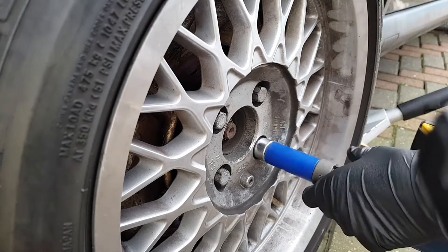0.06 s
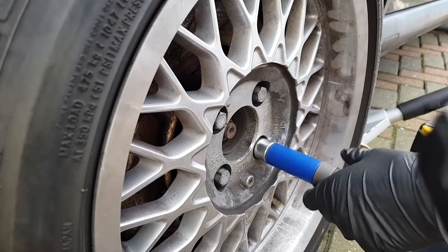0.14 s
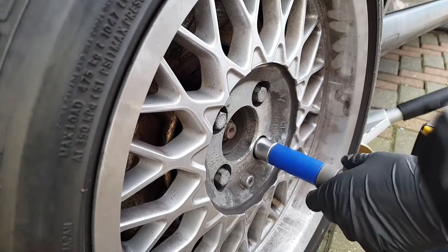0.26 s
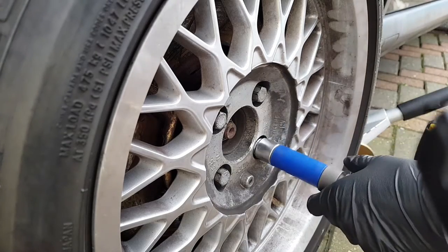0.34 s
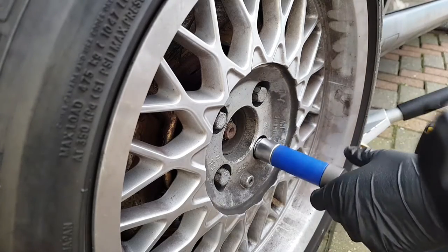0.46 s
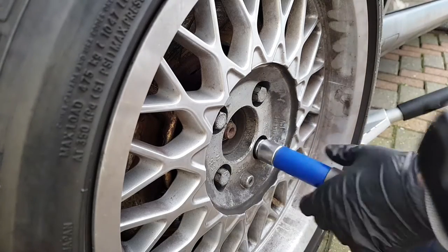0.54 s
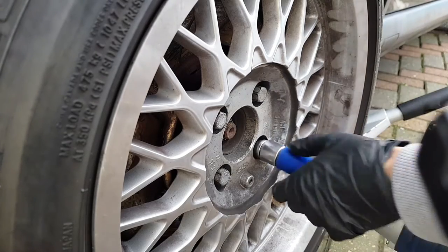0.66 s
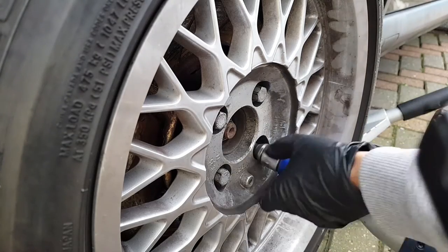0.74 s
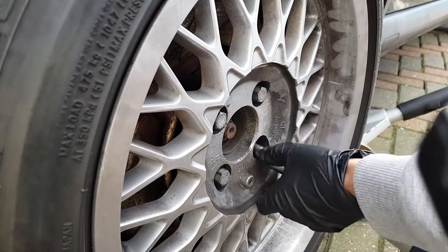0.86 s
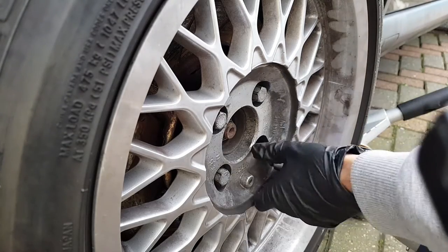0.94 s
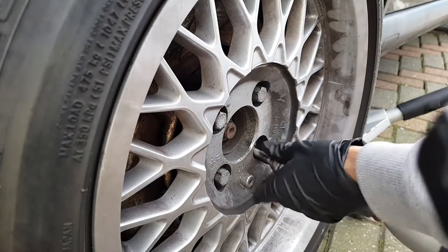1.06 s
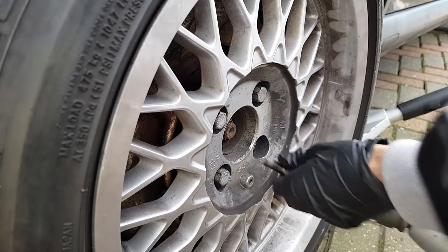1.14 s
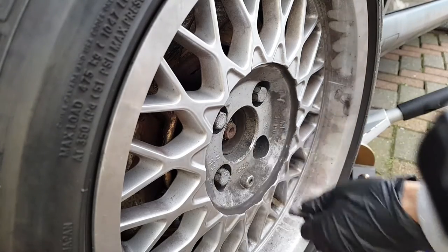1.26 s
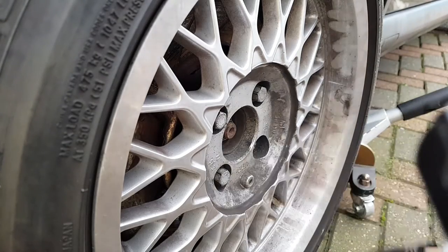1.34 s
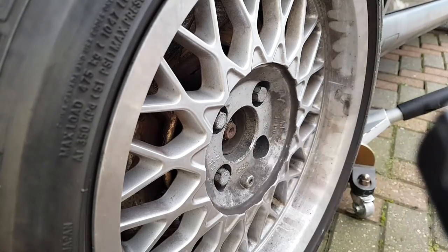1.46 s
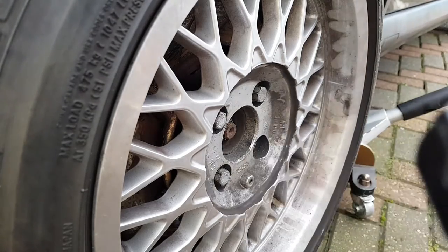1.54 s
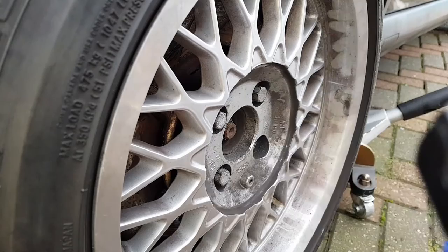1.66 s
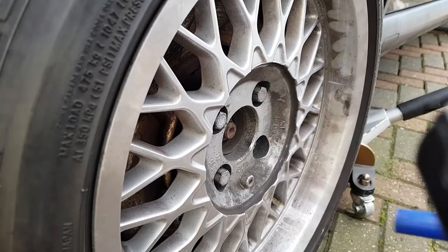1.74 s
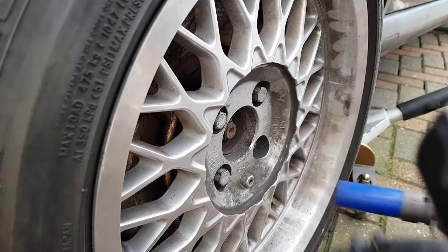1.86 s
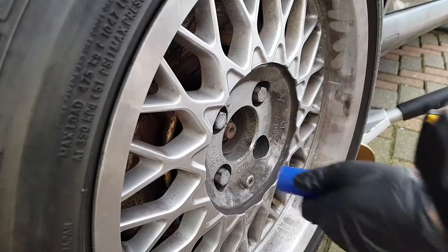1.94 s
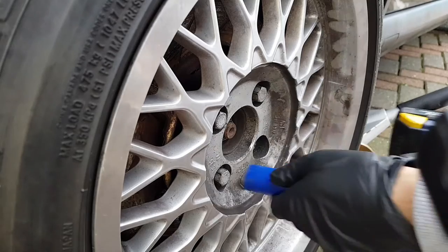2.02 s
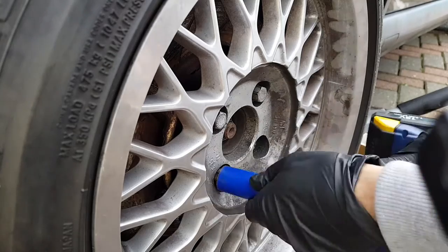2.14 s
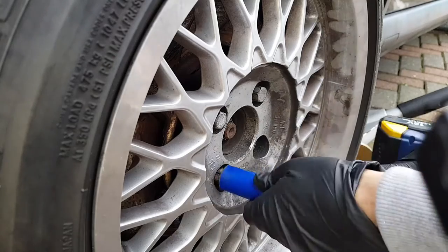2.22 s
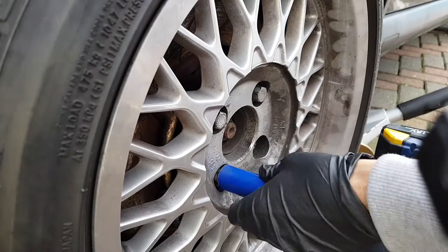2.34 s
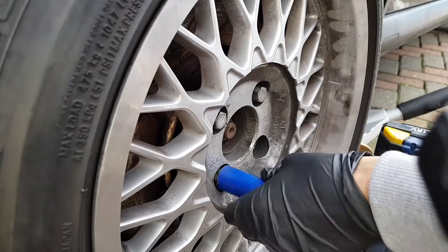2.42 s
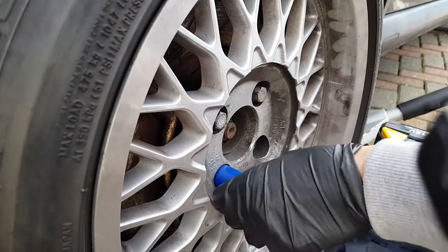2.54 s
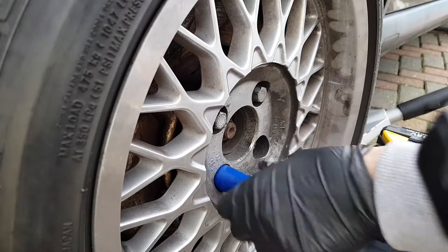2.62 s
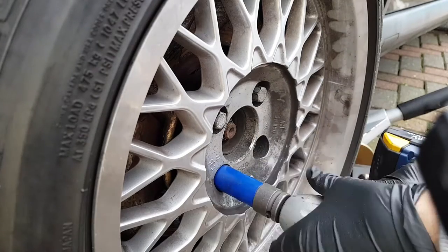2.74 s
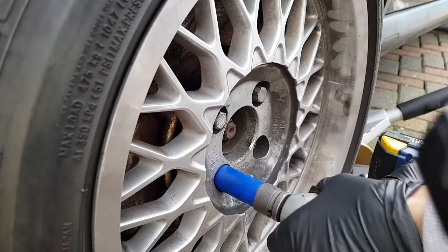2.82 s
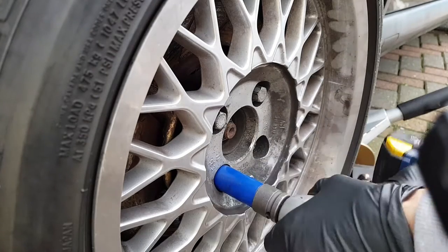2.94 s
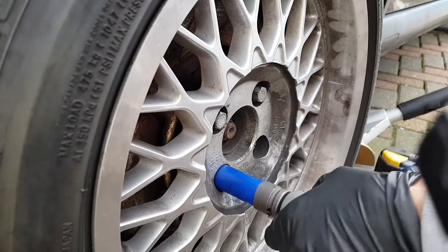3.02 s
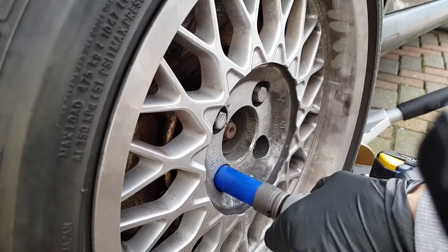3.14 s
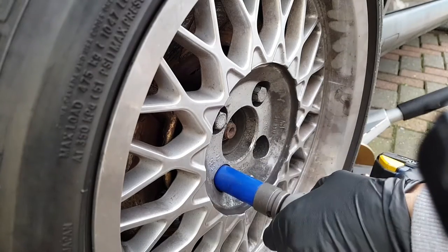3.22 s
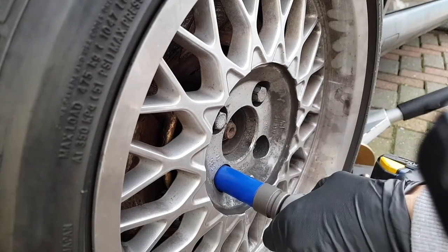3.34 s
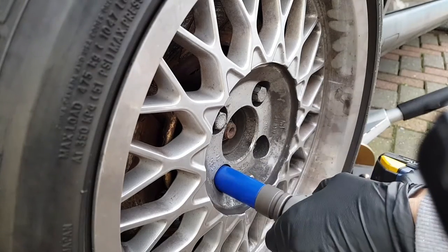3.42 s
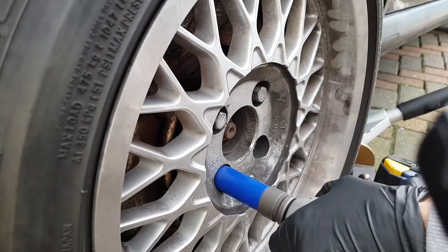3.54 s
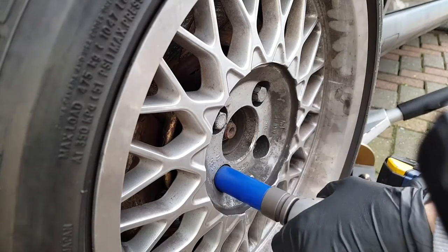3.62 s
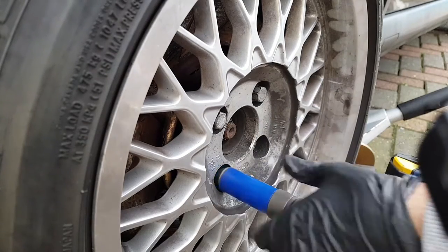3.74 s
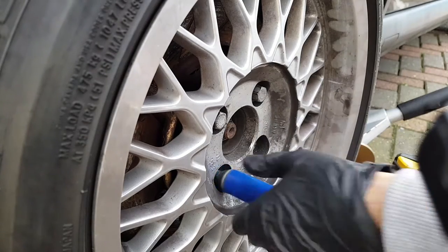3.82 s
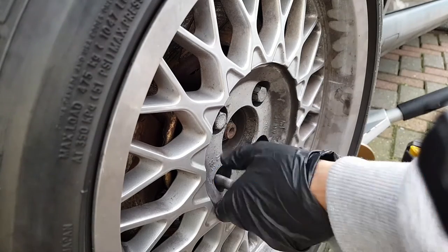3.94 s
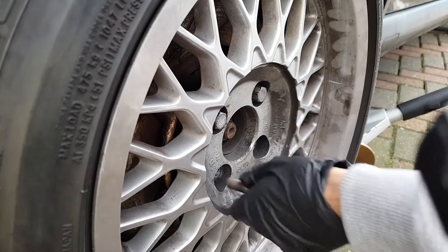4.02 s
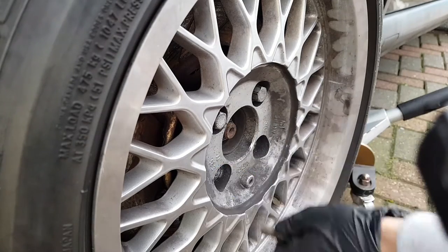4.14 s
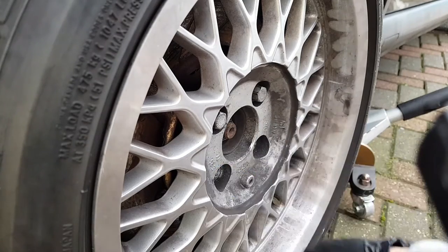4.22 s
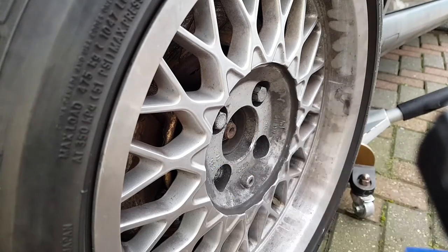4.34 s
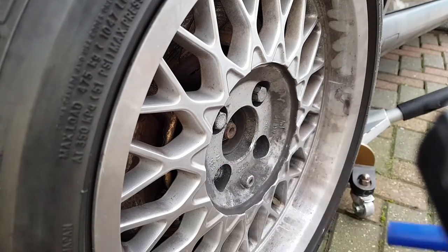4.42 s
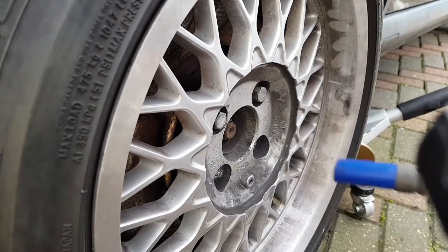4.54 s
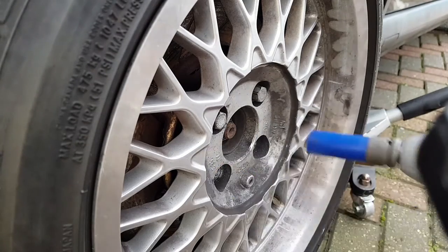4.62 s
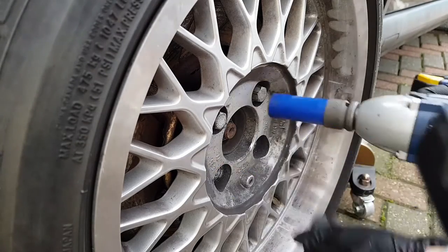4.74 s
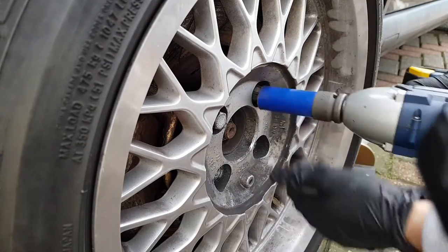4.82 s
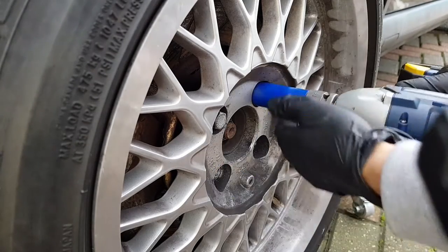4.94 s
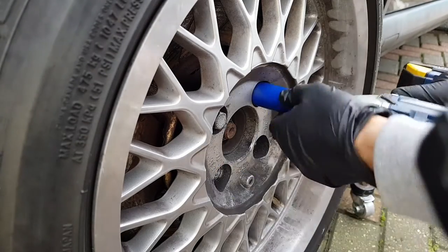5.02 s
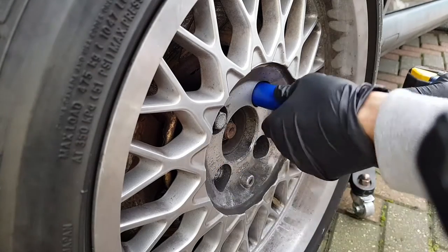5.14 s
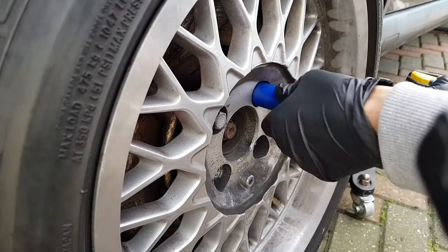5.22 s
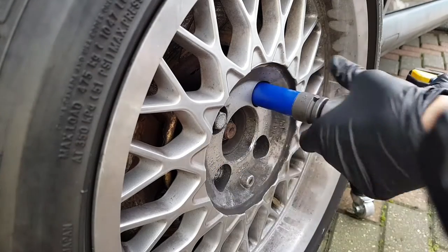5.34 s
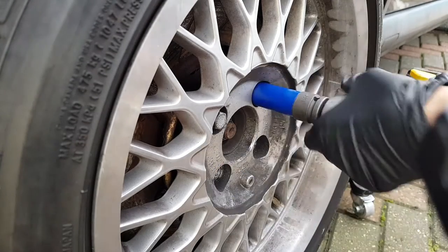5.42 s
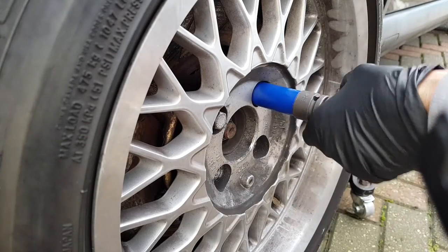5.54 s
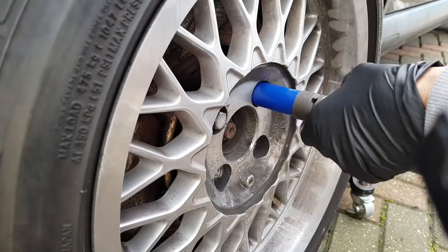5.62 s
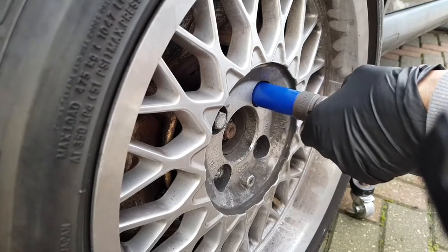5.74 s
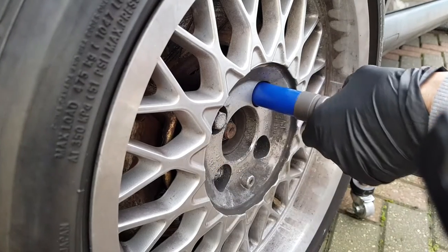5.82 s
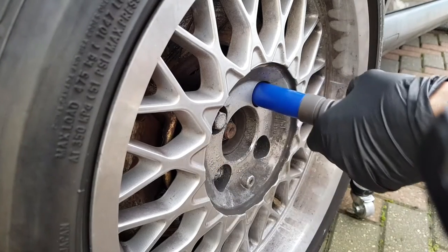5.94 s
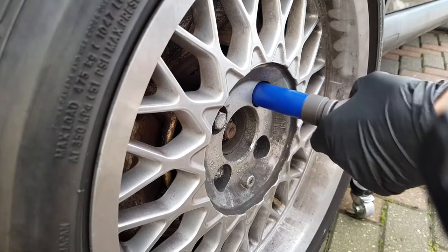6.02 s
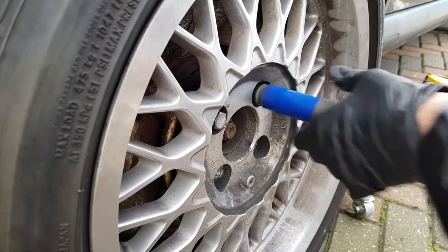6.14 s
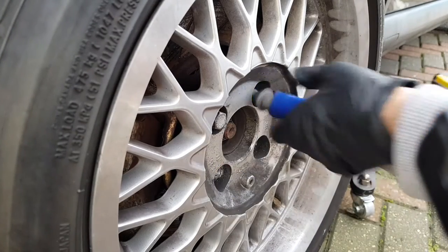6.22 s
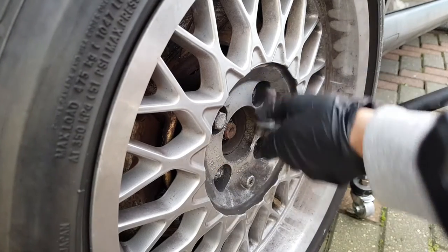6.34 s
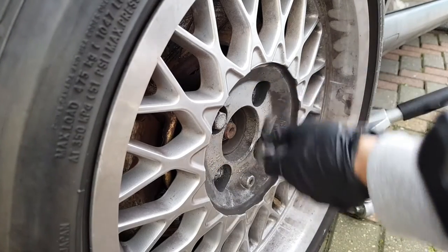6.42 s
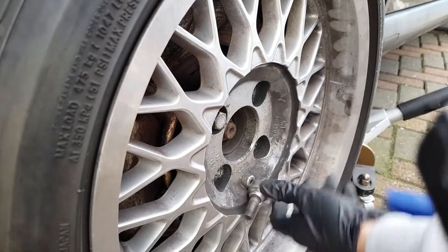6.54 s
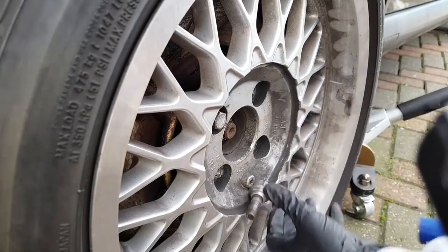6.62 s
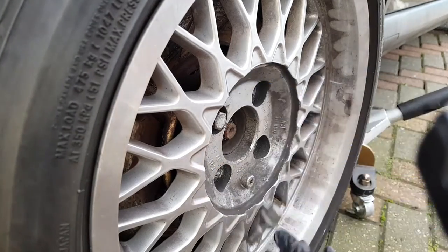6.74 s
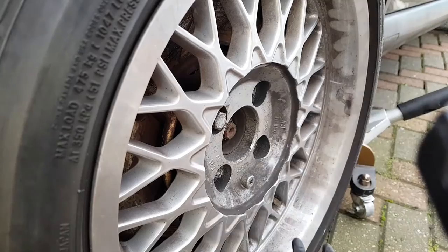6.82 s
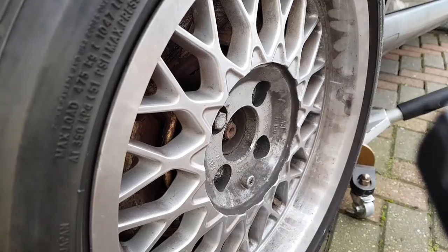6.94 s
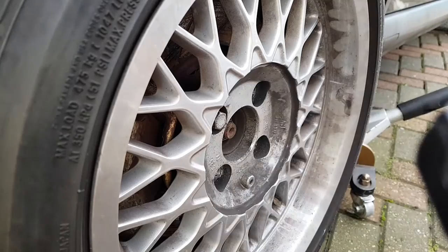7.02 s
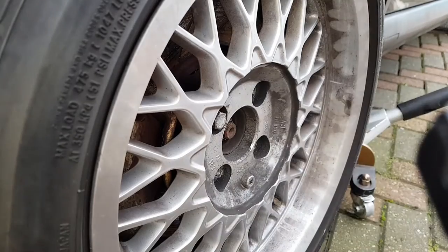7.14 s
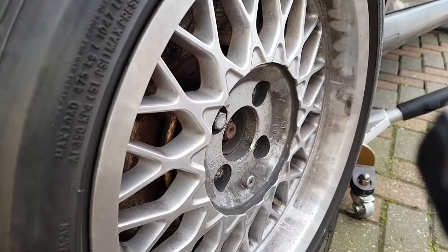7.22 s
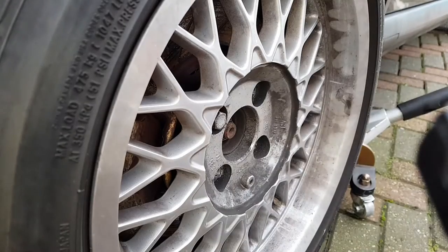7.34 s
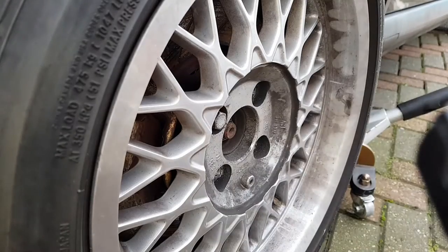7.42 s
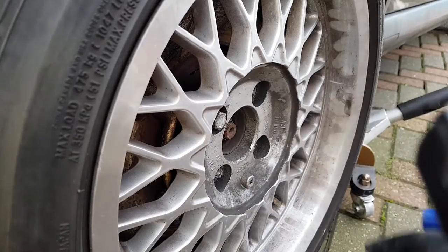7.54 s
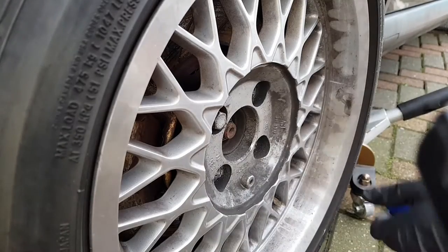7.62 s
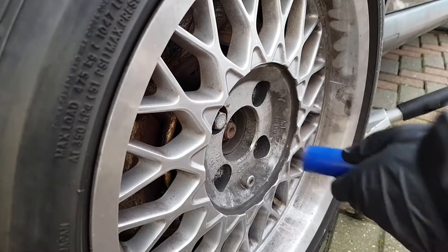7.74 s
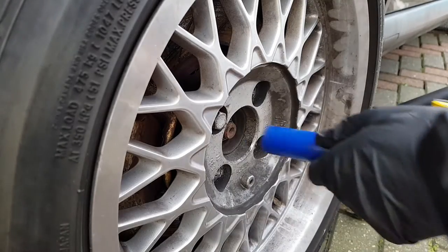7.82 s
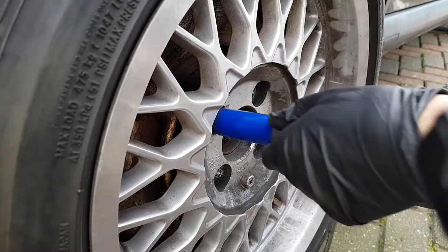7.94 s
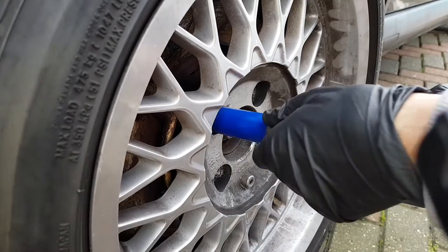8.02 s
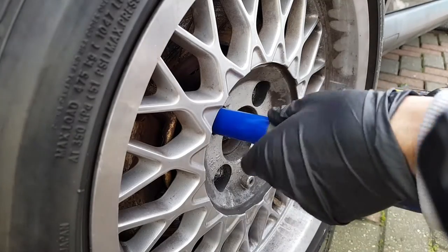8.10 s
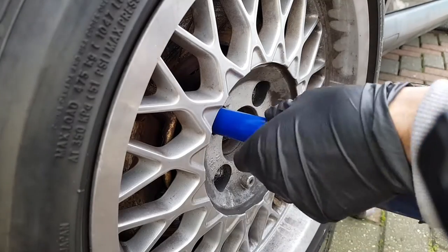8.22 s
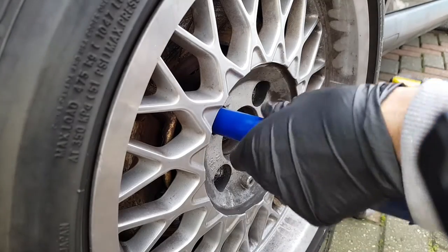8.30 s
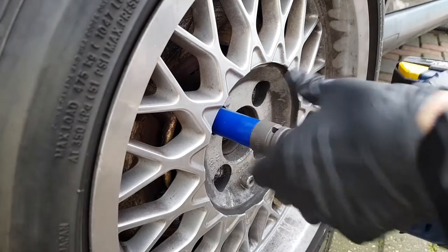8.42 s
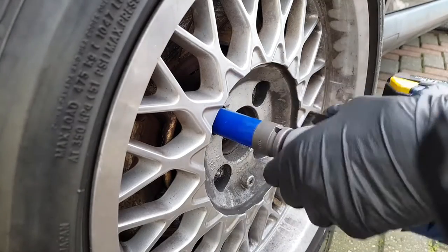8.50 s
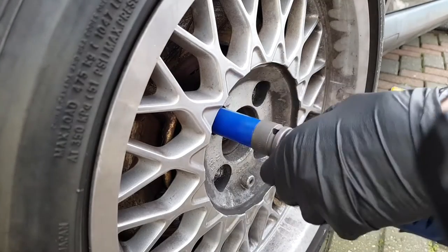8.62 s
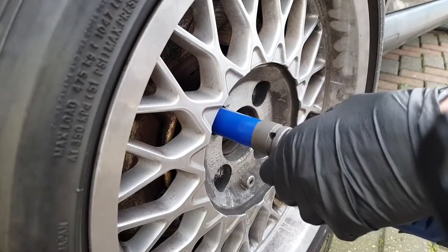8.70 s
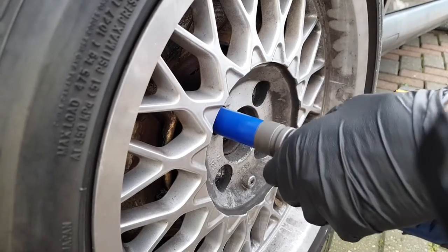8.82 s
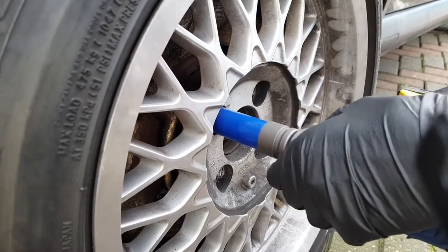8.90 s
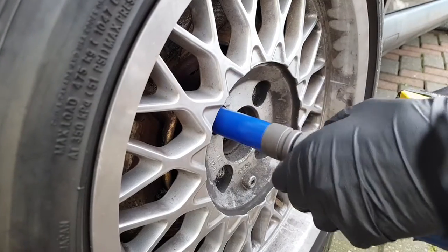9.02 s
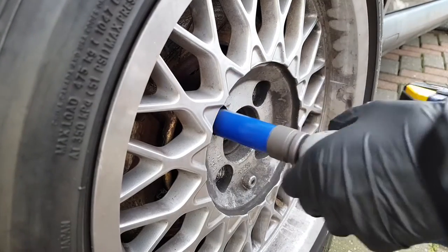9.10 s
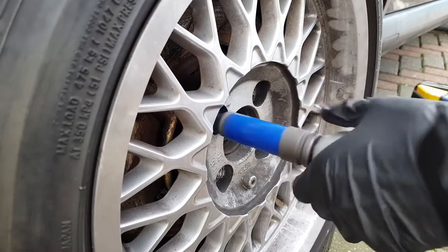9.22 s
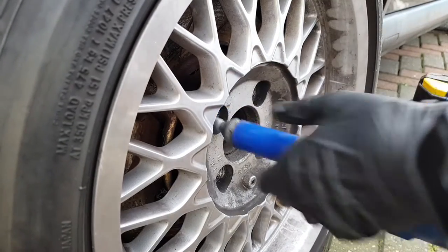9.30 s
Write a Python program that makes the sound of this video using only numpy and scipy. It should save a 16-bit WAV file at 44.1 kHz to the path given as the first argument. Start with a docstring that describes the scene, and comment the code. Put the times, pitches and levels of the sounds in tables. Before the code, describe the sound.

Outdoors and close up, four rattling impact-wrench bursts each run into a rising motor whine, separated by quiet pauses with clicks, rustling and a dropped bolt.

```python
"""A knock and a burst of hammering come first: a cordless impact wrench undoes four bolts of an alloy wheel outdoors.
The hammer pounds the socket about 37 times a second, as noise bursts ringing socket and wheel.
The motor whines freely to spin the bolt out: tones and noise that follow the speed of its shaft.
In between, parts click, a bolt bounces on the paving (struck resonances), thin tones squeak and gloves rustle.
Behind it all, shaped noise rumbles low and swells as the camera is handled, beside a faint wavering hum."""
import sys
import numpy as np
from scipy import signal
from scipy.fft import rfft, irfft, next_fast_len
from scipy.io import wavfile
from scipy.ndimage import uniform_filter1d, map_coordinates

SR = 44100
rng = np.random.default_rng(int(sys.argv[2]) if len(sys.argv) > 2 else 0)


def int16_out(signal):
    """Quantize to a 16-bit WAV file."""
    q = np.round(np.clip(np.atleast_2d(signal).T, -1, 1) * 32767)
    wavfile.write(sys.argv[1], SR, q.astype(np.int16))


N = 413216
TIME = np.arange(N) / SR
AGE = np.arange(SR // 4) / SR  # time since a hit


def amp(db):
    """Decibels to gain."""
    return 10 ** (np.asarray(db) / 20)


def unit(x):
    """Scale to rms 1."""
    return x / np.sqrt(np.mean(x ** 2) + 1e-20)


def along(points, hz):
    """Read a value between (frequency [Hz], value) points on a log frequency axis."""
    point_hz, value = np.transpose(points)
    return np.interp(np.log(hz + 1), np.log(point_hz + 1), value)


def curve(rows, column=1):
    """One value per sample from rows that start with a time."""
    rows = np.array(rows)
    return np.interp(TIME, rows[:, 0], rows[:, column])


def wobble(rate, size=N):
    """A smooth random curve with rate knots a second."""
    knots = rng.standard_normal(int(size * rate / SR) + 4)
    return map_coordinates(knots, [TIME[:size] * rate])


def bell(s, length):
    """A smooth rise and fall around time s; length is its width at 1/e of the peak."""
    return np.exp(-(2 * (TIME - s) / length) ** 2)


def swells(rows):
    """Sum of bells as a gain, from (time [s], length [s], level [dB]) rows."""
    return sum(amp(db) * bell(s, length) for s, length, db in rows)


def filtered(x, response):
    """Multiply the spectrum of x by a function of frequency."""
    size = next_fast_len(len(x) + 8192)
    spectrum = rfft(x, size) * response(np.fft.rfftfreq(size, 1 / SR))
    return irfft(spectrum, size)[:len(x)]


def noise(spectrum):
    """Steady coloured noise of rms 1."""
    return unit(filtered(rng.standard_normal(N), lambda hz: amp(along(spectrum, hz))))


def coloured(x, spectrum, size=2048):
    """Causal filter with the given spectrum: nothing sounds before the hit."""
    gain = amp(along(spectrum, np.fft.rfftfreq(size, 1 / SR)))
    cepstrum = irfft(np.log(gain + 1e-6))
    # folding the cepstrum forward in time gives the minimum-phase filter
    fold = np.r_[1, np.full(size // 2 - 1, 2), np.zeros(size // 2)]
    impulse = irfft(np.exp(rfft(cepstrum * fold)))
    return signal.fftconvolve(x, impulse)[:len(x)]


def resonate(x, modes):
    """Ring x through (frequency [Hz], width [Hz], level [dB]) resonances of alternating sign."""
    def response(f):
        total = 0
        for k, (hz, width, db) in enumerate(modes):
            resonance = 1j * f * width / (hz * hz - f * f + 1j * f * width)
            total = total + (-1) ** k * amp(db) * resonance
        return total
    return filtered(x, response)


def burst(t60):
    """Noise that starts at once and falls 60 dB in t60 seconds."""
    return rng.standard_normal(len(AGE)) * amp(-60 * AGE / t60)


def punch(x, size=220):
    """Scale a hit to the energy of 5 ms (220 samples) at rms 1."""
    return x * np.sqrt(size / np.sum(x ** 2))


def add(track, s, x):
    """Mix x into the track at time s."""
    start = max(round(s * SR), 0)
    track[start:start + len(x)] += x[:max(N - start, 0)]


# colour of the low rumble: (frequency [Hz], level per Hz [dB])
RUMBLE = [(12, -47), (20, -15), (39, -6), (75, 1.5), (118, -3.5), (182, -13.5), (248, -14.5), (280, -13.5),
          (360, -46.5), (620, -120)]
# colour of the soft mid-range wash: (frequency [Hz], level per Hz [dB])
WASH = [(120, -37.5), (200, -9), (267, -16), (344, -8.5), (412, -13), (443, -7), (485, -15), (647, -13.5),
        (963, -14), (1050, -19.5), (1330, -24), (2650, -48.5), (9380, -49), (15000, -57)]
# handling of the camera, heard as low rumble: (time of peak [s], length [s], level [dB])
CAMERA_HANDLING = [(.1, 1, -50), (3.05, 0.96, -40.5), (8.55, 0.47, -43.5)]
RUMBLE_DB, HUM_HZ = -50, 357  # steady level under the handling; pitch of the faint hum


def background():
    """Low rumble, swelling as the camera is handled, a soft mid-range wash and a wavering hum."""
    hum_phase = 2 * np.pi * HUM_HZ * TIME + 1.5 * wobble(25)
    hum = swells([(2.7, 3.1, -51.5)]) * np.sin(hum_phase)
    rumble = amp(RUMBLE_DB) + swells(CAMERA_HANDLING)
    # the wash rises with the handling of the camera, but less
    wash = amp(-56.0 + .5 * wobble(2)) * (rumble / amp(RUMBLE_DB)) ** 0.71
    return rumble * noise(RUMBLE) + wash * noise(WASH) + hum


# how long the echo of car and walls lasts: (frequency [Hz], time to fall 60 dB [s])
YARD = [(150, .25), (600, .2), (3000, .14), (12000, .11)]


def yard(x):
    """A short echo, made of fading noise whose treble dies first, starting 5 ms late."""
    hz, t, z = signal.stft(rng.standard_normal(SR // 2), SR, nperseg=256)
    fading = z * amp(-60 * t / along(YARD, hz)[:, None])
    tail = signal.istft(fading, SR, nperseg=256)[1]
    delayed = np.pad(x, (SR // 200, 0))
    return signal.fftconvolve(delayed, tail / np.linalg.norm(tail))[:N]


# colour of rubbing cloth: (frequency [Hz], level per Hz [dB])
CLOTH = [(1180, 13.5), (2000, -13.5), (3640, -3.5), (4030, -4), (4490, -1.5), (9840, -8.5), (15000, -25)]
# strokes of glove and sleeve, before the wavering lift: (time of peak [s], length [s], level [dB])
STROKES = [(1.16, 0.068, -63), (1.42, 0.48, -68.5), (1.86, 0.082, -56.5), (2.02, 0.25, -67),
           (2.39, 0.15, -62.5), (2.64, 0.17, -67), (2.81, 0.14, -55), (3.05, 0.12, -60.5),
           (4.04, 0.087, -67), (4.2, 0.063, -67.5), (4.35, 0.25, -76), (5.08, 0.065, -77.5),
           (5.33, 0.095, -76), (5.42, .07, -65), (6.91, 0.077, -59), (7.07, 0.085, -65),
           (7.67, 0.11, -61.5), (7.86, 0.15, -64.5), (8.47, 0.12, -55)]
FIDGET_DB = -81  # the hands are never quite still; also before the lift


def handling():
    """Gloves and sleeve rustle in tiny crinkles with each stroke of the hands."""
    crinkles = (rng.random(N) < 30 / SR) * 1.6 * rng.random(N)  # about 30 a second
    grain = np.abs(signal.fftconvolve(crinkles, np.exp(-AGE / .001))[:N])
    crackle = noise([(1500, -20), (3000, -3), (5000, 0), (9000, -7), (15000, -22)])
    swish = noise(CLOTH) + 1.6 * grain * crackle
    lift = amp(4.5 + 1.2 * wobble(25))
    return lift * (amp(FIDGET_DB) + swells(STROKES)) * swish


# thin squeaks: (time [s], length [s], first pitch [Hz], settled pitch [Hz], level [dB])
SQUEAKS = [(1.93, .07, 5500, 4350, -72), (2.172, .12, 5840, 4220, -65), (2.307, 0.24, 5100, 4070, -69),
           (2.547, 0.41, 4270, 4020, -64), (2.84, 0.34, 4180, 4240, -73)]
SQUEAK_SETTLE_S = .024  # time constant of the settling pitch


def squeaks():
    """Something squeaks thinly as the socket is fitted; each unsteady tone slides onto its pitch."""
    out = np.zeros(N)
    for s, length, first_hz, hz, db in SQUEAKS:
        age = np.arange(round(length * SR)) / SR
        slide = hz + (first_hz - hz) * np.exp(-age / SQUEAK_SETTLE_S)
        pitch = slide * (1 + .045 * wobble(900, len(age)))
        fade = np.sqrt(np.abs(np.sin(np.pi * age / length)))
        grip = amp(db + 4.2 * wobble(33.7, len(age))) * fade
        add(out, s, grip * np.sin(2 * np.pi * np.cumsum(pitch) / SR))
    return out


# thud, clack, ring and tick of a knock: (lowest frequency [Hz], highest frequency [Hz])
CONTACT_HZ = [(200, 900), (900, 2500), (2500, 7000), (7000, 12000)]
# ringing of tool and socket: (frequency [Hz], width [Hz], level [dB])
STEEL = [(1350, 350, -6.5), (3460, 210, -10), (4900, 59, -7.5), (8460, 390, -6.5), (10540, 230, -4.5)]
OVERTONE, CLACK_DB = 2.8, -3  # second body mode over the first; clack over thud, before its share of shine


def knock(body_hz, ring_hz, chatter, shine_db, edge_db):
    """A snap and a brief chatter thump the tool's body and ring the parts; short knocks are mostly snap."""
    snap = amp(-3) * punch(AGE == 0)
    force = snap + np.abs(chatter / .03) * punch(burst(chatter))
    parts = [(body_hz, 230, 4), (OVERTONE * body_hz, 260, 4), (ring_hz, 450, 1)]
    sound = amp(-10.5) * force + resonate(force, parts + STEEL)
    # thud, clack, ring and tick each get their own level
    levels = [0, shine_db / 3 + CLACK_DB, shine_db, shine_db + edge_db]
    out = np.zeros(len(AGE))
    for edges, db in zip(CONTACT_HZ, levels):
        band = signal.butter(3, edges, "band", fs=SR, output="sos")
        out += amp(db + 4.5) * punch(signal.sosfilt(band, sound))
    return out


TAPS_PER_S, TAP_DB, TAP_SPREAD_DB = 40, -61.5, 5.5  # top rate; middle level; random spread
TAP_STROKE_DB = -60  # a stroke this strong brings the top rate


def taps():
    """Loose metal taps faintly at random, more often during a stroke of the hands."""
    busy = np.minimum(swells(STROKES) / amp(TAP_STROKE_DB), 1)
    touched = rng.random(N) < busy * TAPS_PER_S / SR
    touches = touched * amp(TAP_DB + TAP_SPREAD_DB * rng.standard_normal(N))
    tap = knock(body_hz=600, ring_hz=4460, chatter=0.019, shine_db=-8.5, edge_db=-7)
    return signal.fftconvolve(touches, tap)[:N]


# bounces of a loose bolt, before a 0.5 dB cut: (time [s], level [dB], bright edge over clonk [dB])
BOUNCES = [(6.47, -45, -17), (6.5427, -35, -11), (6.552, -40, -5), (6.5604, -22, -9), (6.5987, -29.5, -24),
           (6.6249, -23.5, -21), (6.644, -31, -30), (6.674, -39.5, -36), (6.731, -37.5, -32),
           (6.8482, -41.5, -18.5)]
# ringing of bolt on paving: (frequency [Hz], width [Hz], level [dB])
PAVING = [(188, 96, -8.5), (540, 87, 0), (732, 39, 6.5), (918, 46, 2), (1128, 59, -2), (1270, 53, -3.5),
          (1507, 45, 5), (1736, 120, -5), (2110, 58, -6.5), (2710, 165, -9), (3900, 270, -22)]


def dropped_bolt():
    """A bolt bounces and topples on the paving: each hit is a ringing clonk with a bright edge."""
    out = np.zeros(N)
    edge_colour = [(1000, -15.5), (5000, 7.5), (9000, -13.5), (15000, -23.5)]
    for s, db, edge_db in BOUNCES:
        hit = punch(AGE == 0) + amp(-2.0) * punch(burst(0.027))
        clonk = punch(resonate(hit, PAVING))
        edge = amp(edge_db) * punch(coloured(burst(0.025), edge_colour))
        add(out, s, amp(db - 0.5) * (clonk + edge))
    return out


# knocks of socket, bolts and tool: (time [s], level [dB], body [Hz], ring [Hz],
# chatter: time to fall 60 dB [s], shine: ring over thud [dB], edge: tick over ring [dB])
CONTACTS = [(0.011, -20.5, 565, 4440, 0.051, -6.5, -6), (0.902, -38.5, 540, 3150, 0.016, -5, -6),
            (1.1333, -54, 740, 5130, 0.027, -12, -11), (1.789, -24.5, 577, 2970, 0.015, -16.5, 10.5),
            (1.903, -45, 550, 6050, 0.035, -14, -12), (2.2067, -48.5, 523, 4350, .024, -12, -9),
            (2.4085, -45.5, 790, 2780, .06, -27, -8.5), (2.4378, -42, 620, 2920, 0.11, -18, -21),
            (2.5846, -40.5, 443, 4700, 0.027, -3, -17), (3.087, -39.5, 420, 3650, 0.043, -4.5, -20),
            (3.146, -39.5, 430, 4000, 0.093, -12.5, -20), (3.2402, -28, 595, 4900, 0.048, 1.5, -6.5),
            (3.2689, -21, 790, 5000, 0.03, 2, -8.5), (3.4564, -29, 780, 6120, .021, 11.5, -9),
            (3.9801, -36.5, 624, 4800, 0.025, 1.5, -0.5), (4.7318, -30.5, 600, 4800, 0.03, -11.5, -12),
            (4.9112, -39.5, 500, 4220, 0.035, -11, -7), (4.9278, -38.5, 600, 3000, 0.056, 1, -12.5),
            (5.613, -23, 740, 5230, 0.046, 0.5, -5), (5.634, -30, 870, 5150, 0.031, -4, -14),
            (6.2836, -48.5, 587, 4770, 0.014, -3, 5), (6.3296, -39.5, 600, 4900, 0.021, 4.5, -8),
            (6.3462, -41.5, 680, 3470, 0.042, -15, -5), (7.5269, -38.5, 613, 4920, 0.036, -11.5, -1.5),
            (7.531, -30, 574, 5070, 0.017, -4, -17), (7.6711, -37.5, 620, 5040, 0.027, -12.5, -7.5),
            (8.052, -51, 706, 5890, 0.027, -1.5, -14), (8.0715, -39, 645, 3050, 0.082, -11, -17),
            (8.104, -37, 600, 2860, 0.071, -11.5, -13), (8.2076, -40, 485, 3370, 0.034, 0, -14.5),
            (8.6188, -24.5, 770, 5080, 0.05, 4.5, -7.5), (8.641, -23, 720, 3260, 0.063, -2, -13),
            (8.8759, -27, 690, 5060, 0.029, -2, 0.5), (9.3615, -42.5, 720, 3260, 0.04, 4, -3)]
# clinks of the loosened bolt in the spinning socket, before a 12.5 dB cut: (time [s], level [dB])
CLINKS = [(0.65, -33.5), (.684, -33.5), (0.704, -39), (.727, -32), (.7718, -36.5), (0.802, -34.5),
          (3.5182, -24), (3.613, -28.5), (3.6636, -30.5), (3.6748, -34), (3.8233, -39)]


def contacts():
    """Knocks as the socket is fitted and pulled off, and bright clinks while it spins a loose bolt."""
    out = np.zeros(N)
    for s, db, *colour in CONTACTS:
        add(out, s, amp(db) * knock(*colour))
    for s, db in CLINKS:
        clink = knock(body_hz=680, ring_hz=6000, chatter=0.041, shine_db=11, edge_db=-6.5)
        add(out, s, amp(db - 12.5) * clink)
    return out


# chirps of the starting motor: (time [s], length [s], first pitch [Hz], last pitch [Hz], level [dB])
STARTS = [(0.474, 0.071, 2960, 3200, -46), (3.194, 0.064, 3100, 3760, -40),
          (5.551, 0.062, 2940, 3320, -53.5), (8.574, 0.035, 3000, 3450, -40.5)]


def start_chirps():
    """As the trigger is squeezed the motor gives a short, rough, rising chirp."""
    out = np.zeros(N)
    for s, length, first_hz, last_hz, db in STARTS:
        progress = np.minimum(AGE / length, 1)
        pitch = first_hz + (last_hz - first_hz) * progress
        roughness = 1.2 * wobble(700, len(AGE))
        phase = 2 * np.pi * np.cumsum(pitch) / SR + roughness
        add(out, s, amp(db) * np.sin(np.pi * progress) * np.sin(phase))
    return out


# pulls of the trigger: (pressed [s], released [s], motor level [dB], then relative levels of
# the fan's lowest tone [dB], the socket's singing [dB], the wheel's grumble [dB])
RUNS = [(-.1, .452, -37, 0, -17.5, 1), (0.469, 0.863, -38, 1, -18, -6.5),
        (3.162, 3.945, -37.5, 0, -17.5, -5.5), (5.542, 6.282, -37.5, -7, -1, -9),
        (8.544, 9.321, -36.5, 2, -14, -10)]
# motor speed, one curve per pull, before spin-up, braking and jitter: (time [s], turns per second [1/s])
SPEED = [
    [(.1, 342), (.25, 365), (.32, 382), (.37, 379), (.42, 346), (.45, 313)],
    [(.56, 342), (.6, 370), (.66, 389), (.74, 415), (.81, 371), (.86, 330)],
    [(3.56, 345), (3.65, 371), (3.75, 410), (3.8, 420), (3.87, 426), (3.9, 409), (3.95, 350)],
    [(5.65, 350), (5.9, 368), (5.95, 397), (6, 401), (6.05, 395), (6.1, 403), (6.16, 420), (6.2, 395),
     (6.28, 312)],
    [(8.65, 350), (8.83, 390), (8.88, 356), (8.92, 377), (9.03, 390), (9.07, 364), (9.11, 393), (9.19, 419),
     (9.31, 296)],
]
# whine of fan and pinion: multiples of the shaft speed, and the (level [dB]) of each
WHINE_ORDERS = [5, 10, 20, 25, 30, 35]
WHINE = [-9, -20, -10, -10, -20, -21]
# fuzzy overtones of the bearing's ball-pass rate, from the first up: (level [dB])
BEARING = [-15, -12.5, -12.5, -11.5, -15, -16.5, -19]
# colour of gear and air noise: (frequency [Hz], level per Hz [dB])
GEARS = [(71, -33.5), (120, -8.5), (255, -3.5), (375, -11), (611, -6.5), (1430, -9.5), (1870, -3.5),
         (2920, -10), (4300, -6.5), (4760, -4.5), (5380, -6.5), (8080, -8.5), (14000, -18), (15500, -43.5)]
# the sound builds; the shaft gathers speed; the brake slows it
RISE_S, SPIN_UP_S, BRAKE_S = 0.087, .025, .08
# dying away after release; easing as the thread frees; extra while hammering
STOP_DB_PER_S, EASE_DB_PER_S, STRAIN_DB = 565, 6, 5
# the bolt leaves its seat this long after the pull; length and height of its singing; fading of the grumble
UNSEAT_S, SING_S, SING_DB, GRUMBLE_DB_PER_S = 0.47, .22, 12.5, 57


def motor():
    """Whine and bearing tones follow the shaft; bearing, gears and singing swell once per geared-down turn."""
    runs = np.array(RUNS)
    pull = np.searchsorted(runs[1:, 0], TIME)  # which pull each sample belongs to
    pressed, released, motor_db, fan_db, singing_db, grumble_db = runs[pull].T
    held = np.maximum(TIME - pressed, 0)
    braking = np.maximum(TIME - released, 0)
    unseated = held - UNSEAT_S  # negative while the bolt is still seated

    hammering = sum(1. * (TIME > bite) * (TIME < last) for bite, _, last, *_ in BURSTS)
    strain = uniform_filter1d(hammering, size=SR // 20)
    drive_db = motor_db + STRAIN_DB * strain - EASE_DB_PER_S * unseated - STOP_DB_PER_S * braking
    drive = np.minimum(held / RISE_S, 1) ** 2 * amp(drive_db)

    speed = np.choose(pull, [curve(rows) for rows in SPEED])
    speed = speed * (1 - np.exp(-held / SPIN_UP_S)) * np.exp(-braking / BRAKE_S)
    angle = 2 * np.pi * np.cumsum(speed * (1 + .002 * wobble(45))) / SR
    socket_turn = np.sin(angle / 16)  # the socket turns 16 times slower

    tones = []
    for order, db in zip(WHINE_ORDERS, WHINE):
        tones.append(amp(db + 1.8 * wobble(22)) * np.sin(order * angle + .18 * wobble(250)))
    whine = amp(fan_db) * tones[0] + sum(tones[1:])

    ball_pass = 3.055 * angle
    bearing = np.zeros(N)
    for order, db in enumerate(BEARING, 1):
        bearing += amp(db + 3 * wobble(60)) * np.sin(order * (ball_pass + .16 * wobble(170)))

    gears = amp(-2.5 + .9 * wobble(200)) * noise(GEARS)
    sing_rise_db = SING_DB * (bell(pressed + UNSEAT_S, SING_S) - 1)
    sing_colour = [(4400, -39.0), (4800, -2.5), (4900, -1), (5050, -9.0), (5400, -41.5)]
    singing = amp(singing_db + sing_rise_db + 2 * socket_turn) * noise(sing_colour)
    grumble_colour = [(40, -15), (120, -5.0), (260, 0.5), (380, -8),
                      (600, -4.0), (1000, -8.0), (1600, -20), (4000, -44)]
    grumble_fade_db = GRUMBLE_DB_PER_S * np.maximum(unseated, 0)
    grumble = amp(grumble_db - grumble_fade_db) * noise(grumble_colour)

    # the tones stand out at full speed
    shaft_tones = (speed / 400) ** 1.5 * (whine + bearing * amp(4 * socket_turn))
    return drive * (shaft_tones + gears * amp(0.86 * socket_turn) + singing + grumble)


# each bolt rings socket and wheel in its own way: (frequency [Hz], width before the grip [Hz], level [dB])
BOLT_1 = [(590.3, 60, 2.5), (3050, 46, -9.5), (4130, 400, -11), (5300, 520, -10.5), (6470, 270, -10),
          (7900, 230, -8.5), (8970, 160, -12.5), (9440, 89, -8.5), (10300, 150, -9), (12800, 150, -7)]
BOLT_2 = [(247, 22, 5.5), (835, 150, -3), (2144, 35, -7), (3490, 130, -0.5), (5080, 120, 0.5),
          (5400, 150, -0.5), (6130, 130, -8), (7460, 36, -9), (9330, 73, -9.5), (13300, 150, -15)]
BOLT_3 = [(724, 14, -8.5), (1878, 290, -3), (2750, 33, -9), (3580, 52, 1.5), (4550, 120, -5),
          (5350, 220, 0), (6600, 31, -10), (7710, 55, -4.5), (9090, 130, -12), (10920, 26, -12)]
BOLT_4 = [(720, 100, 0.5), (1720, 330, 7.5), (2970, 370, -7), (3870, 52, -11), (4750, 55, -1.5),
          (5350, 140, 2), (7600, 220, -1), (8440, 62, -16), (11200, 140, -22), (13400, 230, -14)]
# one burst of hammering per bolt: (first bite [s], steady beat sets in [s], last blow [s],
# level [dB], level lost per second [dB/s])
BURSTS = [(.0250, 0.0584, .1922, -10.5, 20.5), (3.284, 3.3116, 3.4488, -11, 3.5),
          (5.6440, 5.6724, 5.8662, -13, -2.5), (8.6556, 8.6833, 8.8182, -11, 15.5)]
BLOWS_PER_S = 36.6  # rounded to whole blows in each burst


def blows():
    """Yield time, dB, bolt and whether more follow: a first bite, then an even beat with drifting level."""
    for (bite, steady, last, db, loss), bolt in zip(BURSTS, [BOLT_1, BOLT_2, BOLT_3, BOLT_4]):
        count = round((last - steady) * BLOWS_PER_S) + 1
        for s in [bite, *np.linspace(steady, last, count)]:
            blow_db = db - loss * (s - bite) + rng.normal(0, .4)
            yield s, blow_db, bolt, s < last


# colour of the first crack of a blow: (frequency [Hz], level per Hz [dB])
CRACK = [(120, -42.5), (200, -16), (783, 0), (1280, -11.5), (1810, -5), (4330, -0.5), (5200, 2),
         (7220, -2.5), (12500, -5), (14700, -11.5), (15500, -37)]
# colour of the clatter after it: (frequency [Hz], level per Hz [dB])
CLATTER = [(29, -35.5), (50, -7), (477, 1), (771, 3.5), (1310, -6.5), (1550, -3), (2110, -3.5), (2380, -17),
           (2820, -3), (4340, -8.5), (5390, -3.5), (6690, -13), (8710, -16), (14400, -17), (15500, -42)]


def hammer():
    """Each blow cracks, rings the wheel and jolts the tool; the hammer rides over its cam and clacks back."""
    out = np.zeros(N)
    lift_off = 1 / (1 + (AGE / 0.019) ** 4)  # the scraping ends when the jaws part
    soft_start = 1 - np.exp(-AGE / 0.00025)
    tool_modes = [(38.38, 7, 0.5), (72.5, 16, 1.5), (120, 22, 2), (255, 22, 0.0), (740, 130, -6.0)]
    for s, db, bolt, goes_on in blows():
        # the pressed socket damps the ring
        gripped = [(hz, width + .022 * hz, level) for hz, width, level in bolt]
        crack = amp(-3.5) * punch(coloured(burst(0.021) * soft_start, CRACK))
        ring = amp(-3.0) * punch(resonate(burst(0.018), gripped))
        scrape = amp(-3.5) * punch(coloured(burst(0.42) * lift_off, CLATTER))
        jolt = amp(-12.0) * punch(resonate(AGE == 0, tool_modes))
        add(out, s, amp(db) * (crack + ring + scrape + jolt))
        if goes_on:
            rebound_ring = amp(-14.5) * punch(resonate(burst(0.014), gripped))
            rebound_clack = amp(-8.5) * punch(coloured(burst(0.011), CLATTER))
            rebound_s = s + .0195 + rng.normal(0, .0007)
            add(out, rebound_s, amp(db + rng.normal(0, 1.0)) * (rebound_ring + rebound_clack))
    return out


def scene():
    """All the work happens at one spot in front of the microphone, so both channels are the same."""
    work = hammer() + motor() + start_chirps() + contacts() + dropped_bolt()
    echo = amp(-13.5) * yard(work)
    mono = work + echo + handling() + taps() + squeaks() + background()
    return np.array([mono, mono])


TOP_HZ = 15000  # the phone's upper band limit


def record(dry):
    """The phone rounds off the highest peaks and cuts steeply above its band limit."""
    limited = dry / (1 + np.abs(dry / .9) ** 6) ** (1 / 6)
    return np.array([filtered(side, lambda hz: 1 / (1 + (hz / TOP_HZ) ** 80)) for side in limited])


dry = scene()
out = record(dry)
int16_out(out)
```